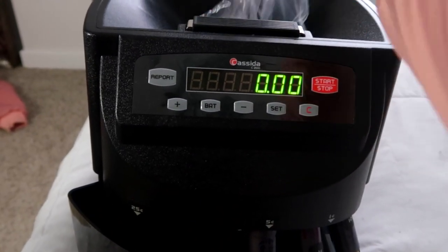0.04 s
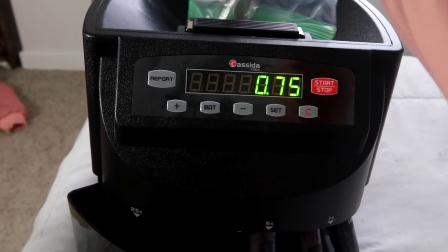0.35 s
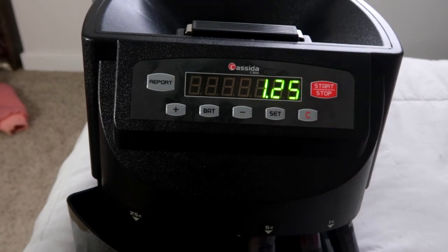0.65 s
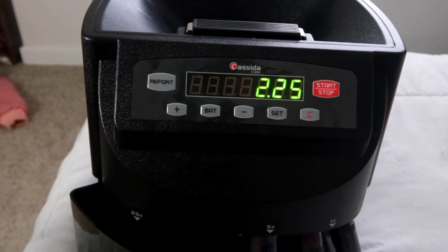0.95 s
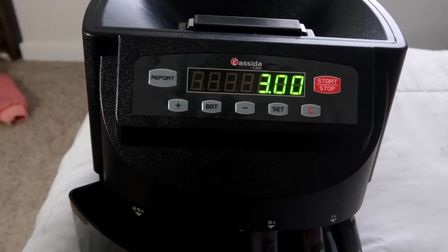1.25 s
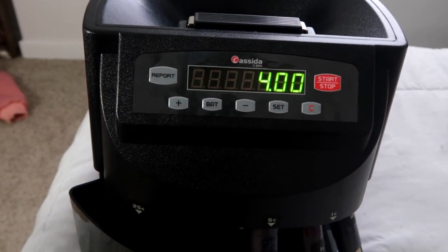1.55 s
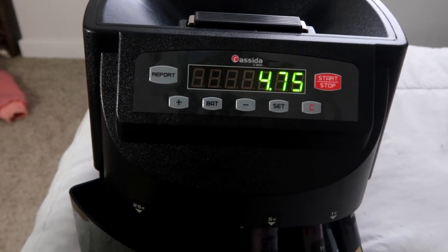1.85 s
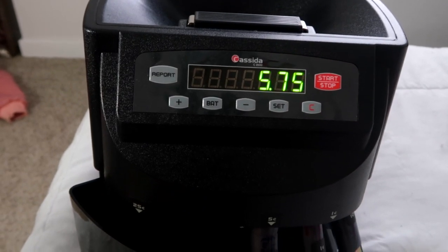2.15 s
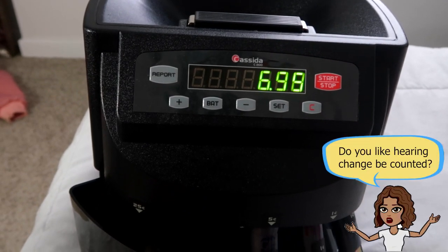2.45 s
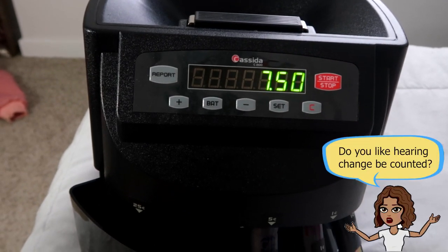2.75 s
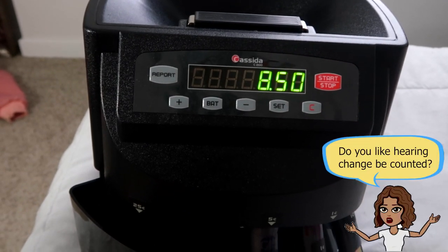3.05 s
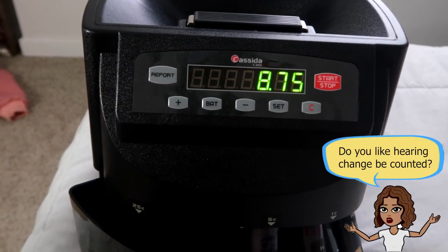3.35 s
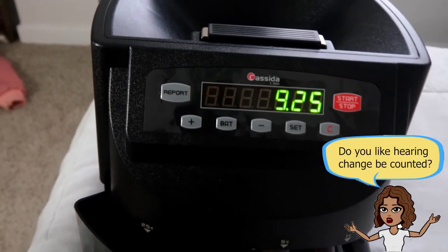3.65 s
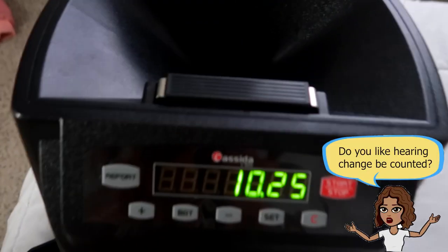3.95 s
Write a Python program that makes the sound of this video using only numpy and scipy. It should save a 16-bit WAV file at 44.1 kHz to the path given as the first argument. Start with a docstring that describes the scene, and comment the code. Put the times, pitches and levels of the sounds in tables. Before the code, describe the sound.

Coins clack and jingle quickly through a whirring sorting machine, heard up close.

```python
"""A small quiet room, the microphone close to a coin counter sorting coins.
Its motor turns a plastic disc that scrapes under the coins and flicks one out up to about 13 times a
second: a sharp clack, then a short rattle down the chute. Now and then the pile tumbles in the plastic
hopper. Past the middle come a few soft bumps on the camera that holds the microphone."""
import sys
import numpy as np
from scipy import signal
from scipy.fft import rfft, irfft
from scipy.io import wavfile

SR = 44100
rng = np.random.default_rng(int(sys.argv[2]) if len(sys.argv) > 2 else 0)


def file_out(sig):
    """Save sig as 16-bit WAV at sys.argv[1]."""
    # one column per channel
    cols = np.atleast_2d(sig).T
    # limit, then scale
    lim = np.clip(cols, -1, 1)
    pcm = np.round(lim * 32767).astype(np.int16)
    wavfile.write(sys.argv[1], SR, pcm)


N = 176400
TIME = np.arange(N) / SR
HIT = np.arange(2600) / SR  # time axis of one impact, s
GRAIN_T60_S = 0.017  # decay of each small coin contact

# coins flicked off the disc: t/s, housing ring/dB, metal snap/dB, chute rattle/dB, ring centre/Hz
CLACKS = [(0.2686, -14, -16, -25.5, 2360), (0.3494, -23.2, -17.5, -28, 3430),
          (0.512, -17.5, -15.5, -37, 2420), (0.6541, -23, -15, -28, 2820),
          (0.7352, -18, -17.5, -27.5, 2470), (0.8062, -24.5, -17.5, -31, 2700),
          (0.8904, -20.5, -18.5, -34, 2460), (0.9585, -23.5, -20.5, -25, 2600),
          (1.0388, -17.5, -20, -26, 2770), (1.123, -20, -19, -24, 2720), (1.2053, -24, -23, -24.5, 2440),
          (1.2829, -15.5, -21, -23, 2200), (1.454, -21, -18.5, -33, 2720), (1.5114, -22, -17.5, -24, 2710),
          (1.5953, -28.5, -20, -34.5, 2800), (1.667, -27, -22.5, -19.5, 2980),
          (1.7493, -18.5, -14.5, -27.5, 2470), (1.8257, -24, -20, -25.5, 2800),
          (1.9205, -24, -17, -27, 2840), (1.9996, -29, -31, -24.5, 2720), (2.0617, -25.5, -18, -22.5, 2600),
          (2.1392, -25, -17.5, -24, 2880), (2.2173, -28, -17.5, -25, 2580),
          (2.295, -20.5, -18.5, -23.5, 3100), (2.3642, -25, -20.5, -23.5, 2660),
          (2.449, -29, -15.5, -26.5, 2780), (2.5267, -32, -20, -23.5, 3100),
          (2.6032, -32, -17, -26.5, 2690), (2.695, -23, -20, -21, 2650), (2.839, -25, -20.5, -25.5, 2630),
          (2.9334, -23.5, -17, -27.5, 2890), (3.0022, -39, -30, -22.5, 2790),
          (3.0835, -19.5, -16, -26, 3000), (3.1576, -26, -15.5, -23, 2830), (3.2312, -27, -18.5, -32, 3330),
          (3.699, -21.5, -18.5, -24, 2600), (3.9296, -27, -18, -24.5, 3170)]
# load of the pile on the disc: t/s, whir/dB, scraping/dB
LOAD = [(0, -33, -37.5), (.6, -38.5, -32), (1.1, -39.5, -35), (1.3, -37, -36.5), (3.15, -34.5, -42),
        (3.3, -32, -32.5), (3.47, -33, -34), (3.65, -34, -30.5), (4, -33, -29.5)]
# spectrum of jingling coins: f/Hz, level/dB
JINGLE = [(100, -69), (1200, -18.5), (1900, 5.5), (2500, 6), (3500, 8), (4200, 4), (5500, 6.5),
          (8200, -0.5), (10000, 2.5), (13000, -6), (16000, -3)]


def amp(db):
    """Decibels to gain."""
    return 10 ** (np.asarray(db) / 20)


def unit(x):
    """Scales to rms 1."""
    return x / np.sqrt(np.mean(x ** 2) + 1e-20)


def unit_attack(x):
    """Scales a hit to rms 1 over its first 5 ms."""
    return x / np.sqrt(np.mean(x[:220] ** 2) + 1e-20)


def add(mix, s, sound):
    """Mixes a sound in at s seconds, a random hair off centre."""
    part = mix[:, max(round(s * SR), 0):][:, :len(sound)]
    lean = 0.0067 * rng.standard_normal()
    part += np.array([[1 + lean], [1 - lean]]) * sound[:part.shape[1]]


def colour(x, spectrum, patchy_db=0):
    """Minimum-phase filter with the given spectrum and optional random bumps on it."""
    hz = np.fft.rfftfreq(4096, 1 / SR)
    f, db = np.transpose(spectrum)
    bumps = np.interp(hz, np.linspace(0, SR / 2, num=40), rng.standard_normal(size=40))
    log_gain = np.log(amp(np.interp(np.log(hz + 1), np.log(f), db) + patchy_db * bumps))
    log_response = np.conj(signal.hilbert(np.r_[log_gain, log_gain[-2:0:-1]]))
    taps = np.fft.ifft(np.exp(log_response)).real
    return signal.fftconvolve(x, taps)[:len(x)]


def decay(t, t60):
    """Exponential fall of 60 dB in t60 seconds."""
    return np.exp(-np.log(1000) * t / t60)


def drift(hz):
    """Random wander slower than hz, rms 1."""
    return unit(irfft(rfft(rng.standard_normal(N)) * (np.fft.rfftfreq(N, 1 / SR) < hz), N))


def swell(start, rise_s, hold_s, fall_db_per_s):
    """Level curve that rises, holds until hold_s after its start, then falls."""
    t = TIME - start
    return np.clip(t / rise_s, 0, 1) * amp(-fall_db_per_s * np.maximum(t - hold_s, 0))


def strike(spectrum, t60, contact=0):
    """One impact: an optional contact spike, dense modes as dying noise, a faint tail in the case."""
    envelope = decay(HIT, t60) + amp(-10) * decay(HIT, t60=0.041)
    burst = rng.standard_normal(len(HIT)) * envelope + contact * (HIT == 0)
    return unit_attack(colour(burst, spectrum, patchy_db=4.5))


def ring(modes, centre_hz=None, pitch=1):
    """A part's modes, each a cluster of three; the spot struck can favour those near centre_hz."""
    span_hz, scatter_db, detune = 480, 1.5, 0.023
    hz, db, t60 = np.repeat(modes, 3, axis=0).T[:, :, None]
    size, shift = rng.standard_normal((2, len(hz), 1))
    phase = rng.random(hz.shape)
    favour = 1 if centre_hz is None else 1 / (1 + ((hz - centre_hz) / span_hz * 2) ** 2)
    cycles = hz * pitch * (1 + detune * shift) * HIT + phase
    partials = favour * amp(db + scatter_db * size) * decay(HIT, t60) * np.cos(2 * np.pi * cycles)
    onset = 1 - np.exp(-HIT / .0003)
    low_cut = signal.butter(3, 480, "high", fs=SR)
    return unit_attack(signal.lfilter(*low_cut, partials.sum(0) * onset))


def patter(level, per_s, spectrum, t60, spread_db=3.5, spots=28):
    """Many small random impacts following a level curve; each spot struck has its own timbre."""
    struck = rng.random(N) < per_s / SR
    impulses = unit(struck * amp(spread_db * np.minimum(rng.exponential(1, N), 2.5)))
    spot, out = rng.integers(0, spots, N), np.zeros((2, N))
    for k in range(spots):
        hit = strike(spectrum, t60)
        add(out, 0, signal.oaconvolve(impulses * level * (spot == k), hit / np.linalg.norm(hit))[:N])
    return out


def drive():
    """Motor tones, the whir of the gears and disc, and coins scraping on it."""
    # spectrum of the running disc: f/Hz, level/dB
    disc = [(20, -28), (100, -15), (190, -14), (280, -5), (330, -18), (420, 1), (480, -12), (630, 7.5),
            (770, 2), (950, 9.5), (1020, 6.5), (1095, 9), (1250, 7), (1500, 0.5), (2500, -2), (5000, -8.5),
            (16000, -23)]
    # motor and gear tones: f/Hz, level/dB
    tones = [(360, -60.5), (1094, -53.5), (1222, -54)]
    flutter_db, speed_waver = 2.5, 0.00404
    s, whir_db, scrape_db = np.transpose(LOAD)
    whir = unit(colour(rng.standard_normal(N), disc) * amp(flutter_db * drift(hz=45)))
    motor_time = np.cumsum(1 + speed_waver * drift(hz=6)) / SR
    hum = sum(amp(db) * np.sqrt(2) * np.sin(2 * np.pi * hz * motor_time) for hz, db in tones)
    scrape_level = amp(np.interp(TIME, s, scrape_db))
    scrape = patter(scrape_level, per_s=1100, spectrum=JINGLE, t60=GRAIN_T60_S, spread_db=8.5)
    return amp(np.interp(TIME, s, whir_db)) * whir + hum + scrape


def hopper():
    """The pile slides and knocks against the hollow plastic bowl."""
    # slides of the pile: t/s, length/s, hollow rumble/dB, jingle/dB
    slides = [(-.02, 0.09, -32, -29), (0.066, 0.043, -30, -26.5), (0.123, 0.038, -26.5, -20),
              (0.185, 0.047, -33.5, -29.5), (0.442, 0.01, -21.5, -19.5), (0.477, 0.028, -34, -26.5),
              (1.274, 0.051, -31, -28), (1.372, 0.11, -34.5, -30.5), (2.32, 0.09, -34, -53),
              (2.747, 0.055, -25, -21), (3.522, 0.14, -36.5, -30.5), (3.639, 0.038, -31.5, -25),
              (3.718, 0.026, -32, -25)]
    # spectrum of the hollow bowl: f/Hz, level/dB
    bowl = [(40, -33), (200, -28.5), (350, -29), (540, -10), (630, -0.5), (780, -8.5), (900, 1.5),
            (1170, -7), (1260, 0), (1400, -7), (1520, -3), (2100, -13), (9000, -23)]
    # coins falling against the wall: t/s, hollow knock/dB, clash of coins/dB, pitch ratio of the spot
    knocks = [(0.0504, -14, -11.5, 1.37), (0.0902, -18.5, -16.5, 1.36), (.1, -22, -23, 1.02),
              (0.139, -18, -32, 1.6), (.1488, -20.5, -36, 1.1), (0.3405, -23, -28, 1.05),
              (.4525, -29, -16.5, 0.73), (.5452, -26.5, -22, 1.01), (2.346, -14.5, -26, 1.1),
              (2.4224, -14, -20, 0.92), (2.7085, -20.5, -18, 1), (2.749, -18, -31, 1.07),
              (2.762, -16.5, -26, 1.07)]
    # modes of the wall at pitch ratio 1: f/Hz, level/dB, t60/s
    wall = [(703, -0.5, 0.025), (833, 7, 0.015), (1190, -5.5, 0.015), (1680, 1, 0.014), (2180, 0, 0.015)]
    rumble, jingle = np.zeros((2, N))
    for s, length, rumble_db, jingle_db in slides:
        envelope = swell(s, rise_s=0.002, hold_s=length, fall_db_per_s=608)
        rumble += amp(rumble_db) * envelope
        jingle += amp(jingle_db) * envelope
    out = patter(rumble, per_s=800, spectrum=bowl, t60=0.014)
    out += patter(jingle, per_s=800, spectrum=JINGLE, t60=GRAIN_T60_S)
    for s, knock_db, clash_db, pitch in knocks:
        knock = amp(knock_db) * ring(wall, pitch=pitch)
        clash = amp(clash_db) * strike(JINGLE, t60=0.053)
        add(out, s, knock + clash)
    return out


def snap(contact=0):
    """Metal on metal: a very short click with a glint in a band that depends on how the coin lands."""
    # spectrum of a coin's snap: f/Hz, level/dB
    spectrum = [(40, -40), (200, -20.5), (420, -6), (800, -7.5), (1500, -6.5), (3000, -6.5), (4500, 0),
                (5600, -3), (6900, 2.5), (8400, -2.5), (10200, 2), (13000, -4), (16000, -6)]
    hz, db = np.transpose(spectrum)
    glint_hz, width_hz = rng.uniform(5600, 15300), 1030
    glint_db = 8 * np.exp(-((hz - glint_hz) / width_hz) ** 2)
    return strike(np.c_[hz, db + glint_db], t60=0.0047, contact=contact)


def jostle():
    """Coins waiting on the disc touch in small, dry ticks, more strongly as the scraping grows."""
    per_s, above_scrape_db = 47, 3.5
    s, _, scrape_db = np.transpose(LOAD)
    out = np.zeros((2, N))
    for when, size in rng.random((round(per_s * N / SR), 2)) * [N / SR, 1]:
        add(out, when, size * amp(np.interp(when, s, scrape_db) + above_scrape_db) * snap())
    return out


def coins():
    """Each coin snaps brightly and rings the housing; a flicked coin rebounds at once."""
    # modes of the housing: f/Hz, level/dB, t60/s
    housing = [(2200, -5, 0.012), (2470, 0.5, 0.019), (2650, -3, 0.031), (3070, -2, 0.022),
               (3540, 0, 0.017)]
    # single coins bouncing or touching: t/s, housing ring/dB, metal snap/dB
    ticks = [(0.1221, -21, -25), (0.219, -24, -28), (0.2917, -48, -24), (0.3926, -28, -21.5),
             (0.4848, -47, -22), (0.62, -49, -37), (0.685, -42, -26.5), (0.7536, -30, -25),
             (0.789, -28, -39), (0.915, -23.9, -24.5), (1.001, -28, -22.5), (1.136, -22.5, -27),
             (1.174, -27, -21), (1.1933, -41, -20), (1.3047, -21, -28), (1.3805, -47, -24.4),
             (1.4594, -22.5, -17), (1.5207, -22.5, -26), (1.6071, -27, -22.5), (1.6744, -22.5, -29),
             (2.1493, -20, -22.5), (2.3263, -33, -15), (2.374, -20, -22), (2.4086, -22.5, -16.5),
             (2.4992, -53, -25.5), (2.543, -22, -34), (2.643, -26.5, -22), (2.657, -34, -22),
             (2.7099, -20.5, -21.5), (2.7442, -23, -18.5), (2.778, -17.5, -30), (2.9496, -21.5, -31),
             (2.9716, -42, -22.5), (3.0196, -24, -34), (3.1813, -44, -25), (3.5163, -47, -24),
             (3.59, -28, -22), (3.6478, -34, -23), (3.712, -21, -26), (3.7256, -38, -19.5),
             (3.7729, -26.5, -19), (3.79, -23.5, -32), (3.806, -31, -22.5), (3.8178, -45, -24),
             (3.853, -36, -20), (3.8845, -29, -20.7)]
    rebound_s, rebound_db = 0.0038, -8
    out = np.zeros((2, N))
    for s, ring_db, snap_db, _, centre_hz in CLACKS:
        add(out, s, amp(ring_db) * ring(housing, centre_hz) + amp(snap_db) * snap(contact=amp(12.5)))
        add(out, s + rebound_s * rng.uniform(0.97, 1), amp(snap_db + rebound_db) * snap())
    for s, ring_db, snap_db in ticks:
        centre_hz = rng.uniform(2300, 3420)
        add(out, s, amp(ring_db) * ring(housing, centre_hz) + amp(snap_db) * snap())
    return out


def chute():
    """After each clack the coin chatters down its chute."""
    # spectrum of the rattle: f/Hz, level/dB
    rattle = [(40, -35), (250, -23.5), (420, -10), (900, -1), (1400, -10), (2000, 0.5), (2600, 3.5),
              (4300, 0), (5600, 0.5), (8300, -4.5), (10000, -1), (13000, -12), (16000, -2.5)]
    level = sum(amp(db) * swell(s, rise_s=0.0043, hold_s=0.024, fall_db_per_s=290)
                for s, _, _, db, _ in CLACKS)
    return patter(level, per_s=450, spectrum=rattle, t60=GRAIN_T60_S)


def handling():
    """Bumps on the camera body reach the microphone as dull thuds, a little louder on the left."""
    # soft bumps: t/s, level/dB
    bumps = [(2.376, -38), (2.41, -45), (2.45, -49), (2.495, -46)]
    spectrum = [(10, -7), (35, 8.5), (70, -9), (130, -4.5), (400, -24), (2000, -78)]  # f/Hz, level/dB
    level = sum(amp(db) * swell(s, rise_s=0.009, hold_s=0.016, fall_db_per_s=700) for s, db in bumps)
    thud = unit(colour(rng.standard_normal(N), spectrum))
    return level * thud * amp([[1.5], [-1.5]])


def room(x, t60):
    """Sparse reflections from the near walls, dying away."""
    per_s, first_s = 4000, 0.002
    t = np.arange(SR // 3) / SR
    reflections = rng.standard_normal(len(t)) * (rng.random(len(t)) < per_s / SR)
    taps = reflections * decay(t, t60) * (t > first_s)
    return signal.oaconvolve(x, taps[None] / np.linalg.norm(taps), axes=1)[:, :N]


def casing(x):
    """The plastic shell colours all that happens inside it."""
    # narrow resonances and hollows of the shell: f/Hz, gain/dB
    bands = [(950, 3), (1160, -11), (1400, -11), (2465, 2), (2790, -2.5), (3090, 3), (3760, 4), (5700, 2)]
    for hz, db in bands:
        x = x + (amp(db) - 1) * signal.lfilter(*signal.iirpeak(hz, Q=28.5, fs=SR), x)
    return x


def widen(mix):
    """A faint side signal of wandering phase spreads the image a little, mostly in the treble."""
    # side signal relative to the middle: f/Hz, level/dB
    width = [(50, -19), (200, -27), (650, -34), (1400, -61), (3000, -26), (6000, -16), (14000, -10.5)]
    wandering = signal.hilbert(mix.mean(0)) * np.exp(1j * np.pi * drift(hz=30))
    side = colour(wandering.real, width)
    return mix + np.array([side, -side])


def scene():
    """The machine close up, the room faint behind it, and the bumps at the microphone."""
    impacts = coins() + chute() + hopper() + jostle()
    machine = casing(impacts + amp(-9) * room(impacts, t60=0.1) + drive())
    return widen(machine) + handling()


def record(dry):
    """Peaks clip at full scale; then the treble is cut above 15.9 kHz."""
    low_pass = signal.firwin(301, 15900, window=("kaiser", 8), fs=SR)
    return signal.oaconvolve(np.clip(dry, -1, 1), low_pass[None], "same")


dry = scene()
out = record(dry)
file_out(out)
```